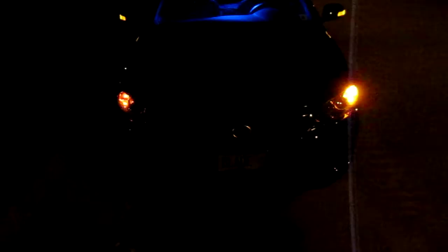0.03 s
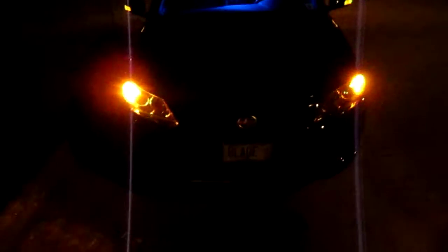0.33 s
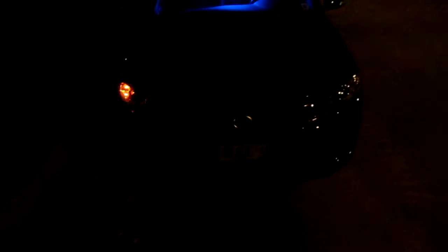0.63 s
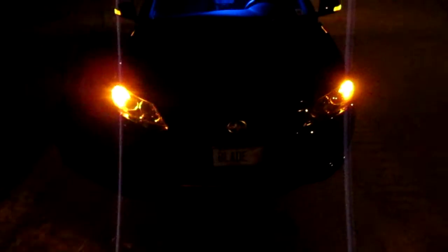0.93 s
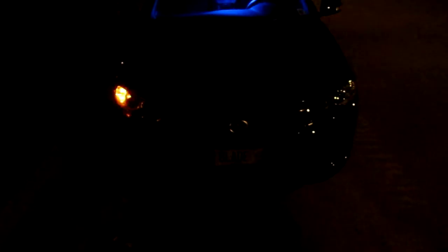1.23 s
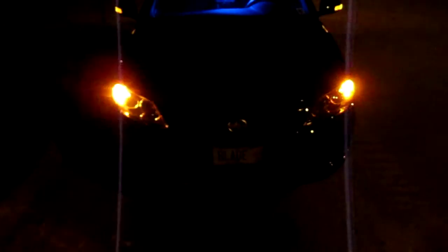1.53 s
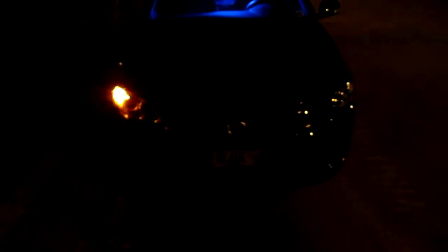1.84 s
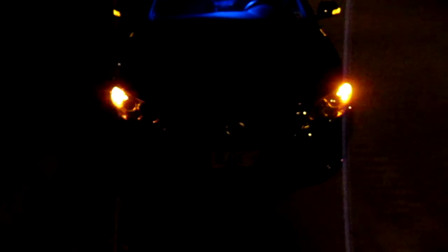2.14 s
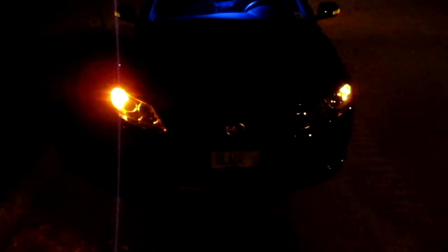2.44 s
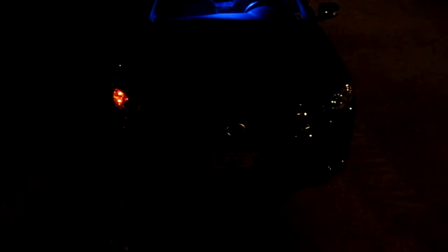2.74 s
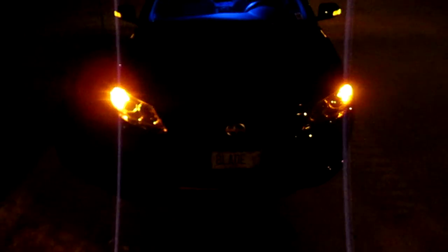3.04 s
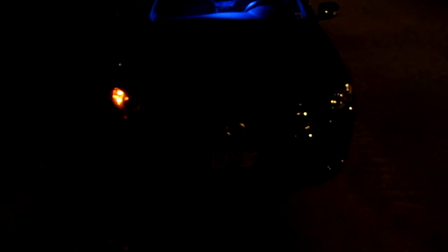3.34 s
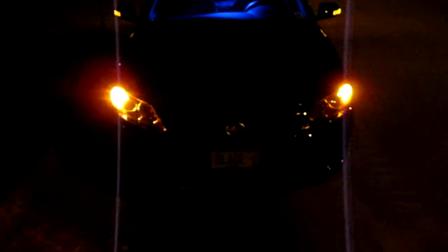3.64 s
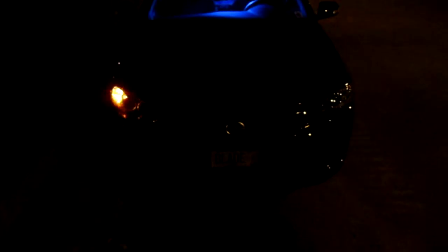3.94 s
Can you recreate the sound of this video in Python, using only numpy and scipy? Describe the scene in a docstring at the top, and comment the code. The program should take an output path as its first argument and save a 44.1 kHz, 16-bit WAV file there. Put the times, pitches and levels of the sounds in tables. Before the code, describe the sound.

A parked car engine idles steadily, with two faint clicks near the start.

```python
"""A car idling at night

A parked car idles before a hand-held camera. Periodic firing gives a soft harmonic drone, belts and
fan give a broadband whirr, and spinning parts add unsteady whines, over a low boom and a faint hiss.
Early on, a finger ticks, slides and clicks on the camera body, by impact and stick-slip friction."""
import sys
import numpy as np
from scipy import signal
from scipy.fft import rfft, irfft, next_fast_len
from scipy.io import wavfile
from scipy.ndimage import map_coordinates

SR = 44100
rng = np.random.default_rng(int(sys.argv[2]) if len(sys.argv) > 2 else 0)


def digitize_waveform(pressure):
    """Quantize a signal to 16-bit integers and store it at the path in sys.argv[1].

    Rows of a 2-D input are taken as channels; values are limited to [-1, 1].
    """
    field = np.atleast_2d(pressure).T
    bounded = np.clip(field, -1, 1)
    quanta = np.round(bounded * 32767).astype(np.int16)
    wavfile.write(sys.argv[1], SR, quanta)


N = 176400
TIME = np.arange(N) / SR


def amp(db):
    """Decibels to amplitude ratio."""
    return 10 ** (np.asarray(db) / 20)


def unit(x):
    """Normalisation to rms 1."""
    return x / np.sqrt(np.mean(x ** 2) + 1e-20)


def along(points, hz):
    """Interpolation on a logarithmic frequency axis."""
    f, v = np.transpose(points)
    return np.interp(np.log(hz + 1), np.log(f + 1), v)


def wobble(rate):
    """Smooth random modulation: a spline with `rate` knots a second."""
    return map_coordinates(rng.standard_normal(1024), [np.arange(N) * rate / SR], mode="wrap")


def filtered(x, response):
    """Linear filtering: the spectrum times a frequency response."""
    m = next_fast_len(N + 8192)
    return irfft(rfft(x, m) * response(np.fft.rfftfreq(m, 1 / SR)), m)[..., :N]


def noise(spectrum):
    """Spectral shaping of two independent noises, to rms 1."""
    return unit(filtered(rng.standard_normal((2, N)), lambda hz: amp(along(spectrum, hz))))


def stereo_noise(spectrum, coherence):
    """Partially coherent noise: the ratio of mid to side sets how alike the channels are."""
    def weights(hz):
        angle = np.arccos(np.clip(along(coherence, hz), -1, 1)) / 2
        return np.array([np.cos(angle), np.sin(angle)])
    mid, side = filtered(noise(spectrum), weights)
    return unit(np.array([mid + side, mid - side]))


# Each row: frequency in Hz, relative spectral density in dB.
HISS_SPECTRUM = [(500, -22), (3000, 5), (3900, -17), (4500, -0.5), (5300, 4), (6300, 3.5), (7200, 0),
                 (9500, -5), (10500, -14.5), (12500, -21.5), (15000, -33)]
# Each row: frequency in Hz, left-right coherence.
HISS_COHERENCE = [(4000, 0.29), (6200, 0.35), (9000, 0.51), (11000, 0.46), (14000, 0.25)]

def hiss(level_db=-61.5):
    """Stationary, weakly coherent treble noise is heard as a faint, wide hiss."""
    return amp(level_db) * stereo_noise(HISS_SPECTRUM, HISS_COHERENCE)


# Each row: start in seconds, end in seconds, level at full pressure in dB.
FINGER_SLIDES = [(.37, .50, -72.5), (.602, .644, -60.5)]
# Each row: frequency in Hz, relative spectral density in dB.
SKIN_SPECTRUM = [(1500, -12), (5000, -3), (9000, -2), (11500, -6), (13000, -10), (15000, -21)]

def slides(release_s=0.008, slips_per_s=190, slip_t60_s=0.005, slip_db=11, spread_db=3):
    """Stick-slip friction: skin rubs the camera ever harder, catching and slipping in tiny ticks."""
    pressure = 0
    for start, end, db in FINGER_SLIDES:
        rise = np.sqrt(np.clip((TIME - start) / (end - start), 0, 1))
        pressure += amp(db) * rise * np.clip((end - TIME) / release_s, 0, 1)
    slips = (rng.random(N) < slips_per_s / SR) * amp(slip_db + spread_db * rng.standard_normal(N))
    decay = amp(-60 * TIME[TIME < slip_t60_s] / slip_t60_s)
    ticks = signal.fftconvolve(slips, decay)[:N]
    return pressure * unit(noise(SKIN_SPECTRUM) * (1 + ticks))


# Each row: start in seconds, crack and ring levels in dB, attack and crack T60 in seconds.
FINGER_CLICKS = [(.2753, -38.5, -45, .0001, .005), (.6419, -33, -25.8, .0005, .008)]
# Each row: frequency in Hz, relative level in dB, T60 in seconds.
SHELL_MODES = [(1140, -5, 0.014), (1690, -1, 0.013), (2200, -4.5, .012), (2720, -3, .011),
               (3480, -8, 0.0078)]
# Each row: frequency in Hz, relative spectral density in dB.
CRACK_SPECTRUM = [(500, -14), (1500, -4), (3000, 0), (4000, -2), (6000, -4.5), (9000, -6), (11000, -19),
                  (15000, -33)]

def clicks():
    """Impact excitation: each bright crack rings the damped modes of the camera's shell."""
    burst, out = noise(CRACK_SPECTRUM), 0
    for start, crack_db, ring_db, attack, crack_t60 in FINGER_CLICKS:
        age = np.maximum(TIME - start, 0)
        ring = 0
        for hz, db, t60 in SHELL_MODES:
            phase = 2 * np.pi * hz * age + rng.uniform(0, np.pi / 2, (2, 1))
            ring += amp(ring_db + db - 60 * age / t60) * np.sin(phase)
        crack = amp(crack_db - 60 * age / crack_t60) * burst
        out += (1 - np.exp(-age / attack)) * (ring + crack)
    return out


def finger(pan_db=1.5):
    """A level difference places the finger a little nearer the right microphone."""
    return (slides() + clicks()) * amp([[-pan_db], [pan_db]])


# Each row: time in seconds, level in dB before the offset.
BOOM_ENVELOPE = [(0.1, -49), (0.6, -51), (1.02, -47), (1.07, -40), (1.16, -55), (1.35, -48), (1.42, -42),
                 (1.5, -48), (2.0, -48), (4.0, -50)]
RUMBLE_ENVELOPE = [(0.1, -67), (0.7, -66), (1.22, -78), (1.4, -74), (1.62, -86), (1.83, -88), (2.2, -77),
                   (4.0, -72)]
# Each row: frequency in Hz, relative spectral density in dB.
BOOM_SPECTRUM = [(60, -120), (170, -35), (232, 2), (262, 3), (295, -5.5), (380, -30), (1000, -120)]
RUMBLE_SPECTRUM = [(18, -21), (38, 3), (55, 9.5), (75, -5), (130, -43), (600, -120)]
# Each row: frequency in Hz, left-right coherence. The whirr shares it.
ENGINE_COHERENCE = [(40, 0.44), (90, 0.68), (170, 0.59), (260, 0.76), (400, 0.43), (560, 0.96),
                    (1400, 0.69), (3200, 0.63), (6000, 0.18)]

def boom_and_rumble(boom_offset_db=-0.5, rumble_offset_db=3):
    """Slow amplitude modulation of two noise bands: a hollow boom and a deep rumble under the car."""
    def band(envelope, spectrum):
        return amp(np.interp(TIME, *np.transpose(envelope))) * stereo_noise(spectrum, ENGINE_COHERENCE)
    boom = amp(boom_offset_db) * band(BOOM_ENVELOPE, BOOM_SPECTRUM)
    rumble = amp(rumble_offset_db) * band(RUMBLE_ENVELOPE, RUMBLE_SPECTRUM)
    return boom + rumble


# Each row: frequency in Hz, level in dB, nominal line width in Hz.
WHINE_LINES = [(91.6, -54.5, 2.515), (525.4, -56, 14), (589, -58.5, 14), (719, -62, 5), (1002, -61.5, 14),
               (1161, -62, 10), (3030, -80, 11), (3600, -84, 6), (5570, -86, 8.7)]

def whines():
    """Line broadening: random amplitude and phase modulation blur the fan, belt and alternator tones."""
    out = 0
    for hz, db, width in WHINE_LINES:
        strength = 1 + 0.44 * wobble(2 * width)
        phase = 2 * np.pi * hz * TIME + 1.64 * wobble(width)
        out += amp(db) * unit(strength * np.sin(phase))
    return out


# Each row: multiple of the firing rate, level in dB.
FIRING_HARMONICS = [(2, -65.5), (3, -63.5), (4, -55), (5, -60), (8, -59.5), (9, -58), (12, -57)]

def drone(phase, uneven_db=2.0):
    """Periodic firing gives a harmonic series, each partial a little uneven in strength."""
    out = 0
    for order, db in FIRING_HARMONICS:
        peak = np.sqrt(2) * amp(db + uneven_db * wobble(6.98))
        out += peak * np.sin(order * phase + rng.uniform(0, 2 * np.pi))
    return out


# Each row: frequency in Hz, relative spectral density in dB.
WHIRR_SPECTRUM = [(20, -42), (45, -21), (75, -12.5), (110, -2.5), (190, -1.5), (255, -2.5), (350, -3.5),
                  (420, -9.5), (490, -4.5), (630, -6.5), (750, -10), (880, -11.5), (1350, -18),
                  (2000, -21.5), (3000, -26.5), (4000, -38), (5500, -39.5), (9000, -46), (15000, -91)]

def whirr(phase, level_db=-38.5, flutter_db=0.13, firing_depth=0.033, crank_depth=0.027):
    """Amplitude modulation: engine-bay noise swells slightly with each firing and turn of the crank."""
    swell = 1 + firing_depth * np.sin(phase) + crank_depth * np.sin(phase / 2)
    gain = amp(level_db + flutter_db * wobble(24.94))
    return gain * swell * stereo_noise(WHIRR_SPECTRUM, ENGINE_COHERENCE)


def engine(firing_hz=29.47, drift=0.01203):
    """Phase locking: whirr and drone follow one drifting firing rate; the other layers run free."""
    phase = 2 * np.pi * np.cumsum(firing_hz * (1 + drift * wobble(3))) / SR
    return whirr(phase) + drone(phase) + whines() + boom_and_rumble()


def scene():
    """Superposition of engine, finger and hiss."""
    return engine() + finger() + hiss()


# Each row: frequency in Hz, left minus right level in dB.
MIC_BALANCE = [(40, -5), (90, -1.5), (250, 0), (600, 0.6), (2000, 0.5), (9000, 0)]
# Each row: frequency in Hz, phase lead of the left channel in radians.
MIC_PHASE_LEAD = [(50, 0.06), (200, 0.37), (600, 0.51), (3000, 0.092), (5000, .4), (6200, 0.85),
                  (7500, 2.23), (9500, 2.7), (11000, 2)]

def record(dry, start_s=0.071, fade_s=0.01, top_hz=15100):
    """Two band-limited microphones differ in level and phase; the sound cuts in after a moment."""
    def microphones(hz):
        left_over_right = amp(along(MIC_BALANCE, hz)) * np.exp(1j * along(MIC_PHASE_LEAD, hz))
        return left_over_right ** np.array([[0.5], [-0.5]])  # half the difference to each side
    fade_in = np.clip((TIME - start_s) / fade_s, 0, 1)
    return filtered(filtered(dry, microphones) * fade_in, lambda hz: hz < top_hz)


dry = scene()
out = record(dry)
digitize_waveform(out)
```